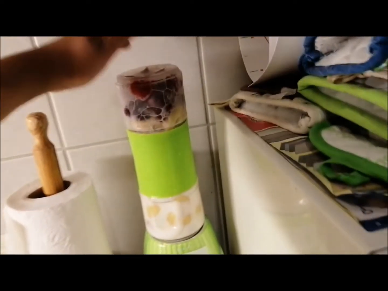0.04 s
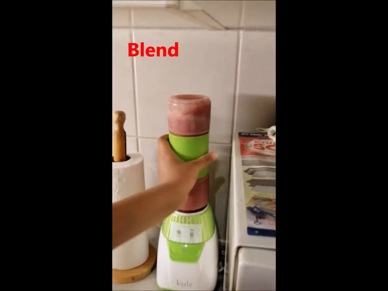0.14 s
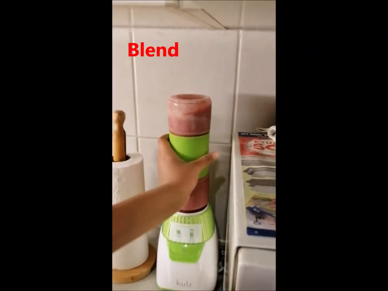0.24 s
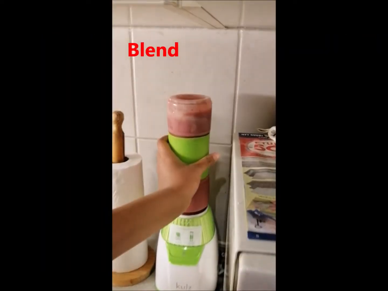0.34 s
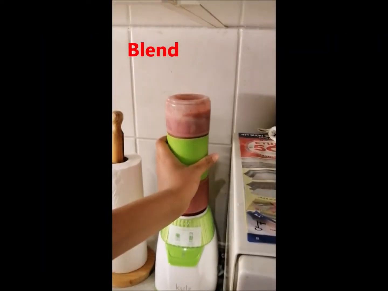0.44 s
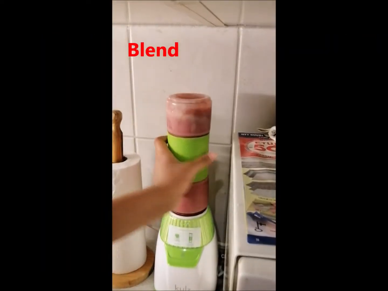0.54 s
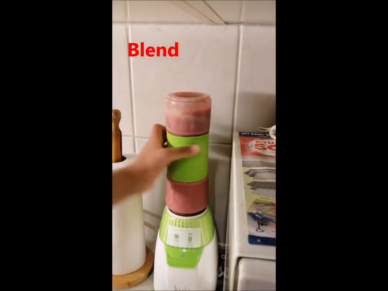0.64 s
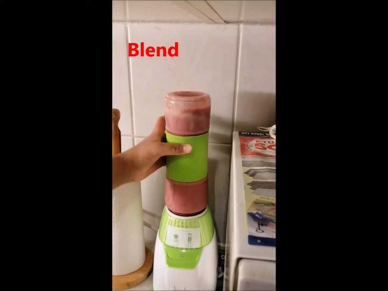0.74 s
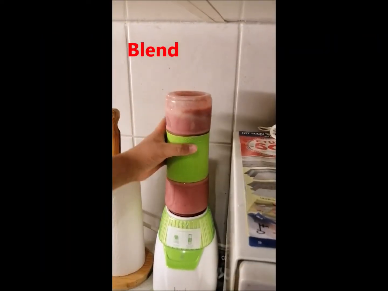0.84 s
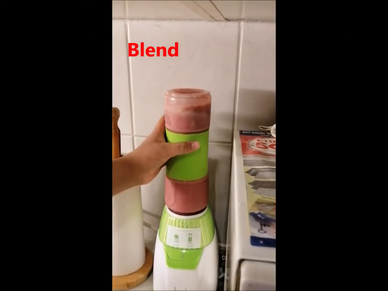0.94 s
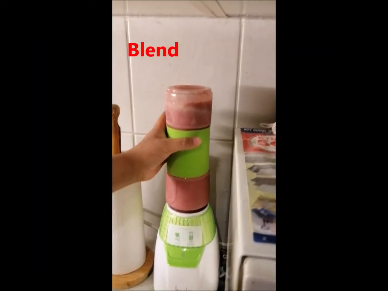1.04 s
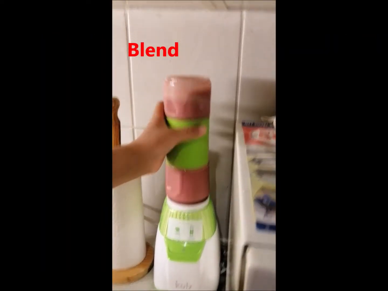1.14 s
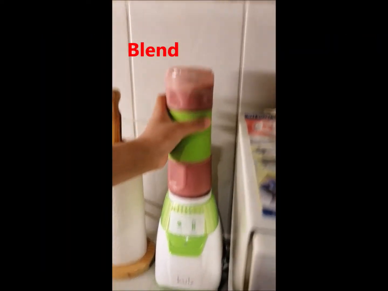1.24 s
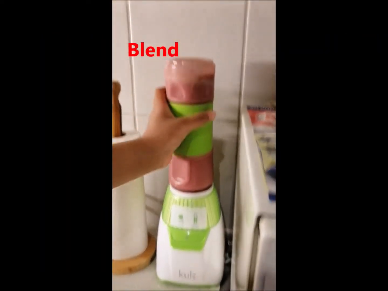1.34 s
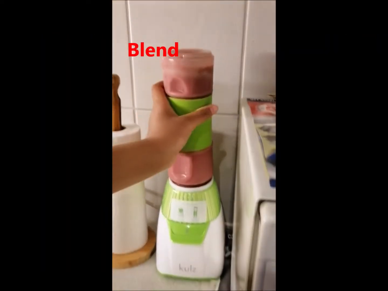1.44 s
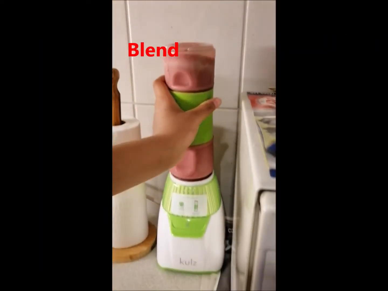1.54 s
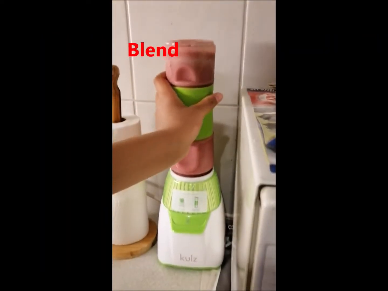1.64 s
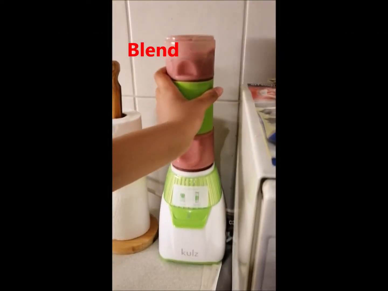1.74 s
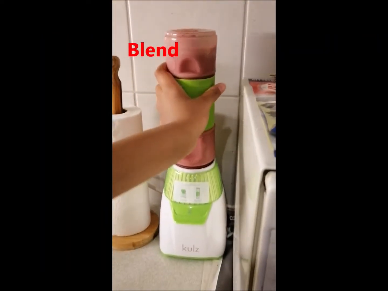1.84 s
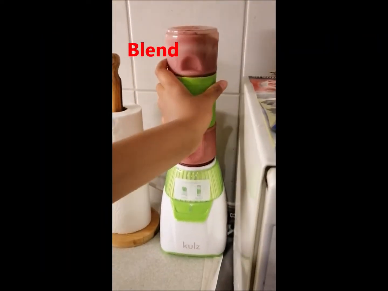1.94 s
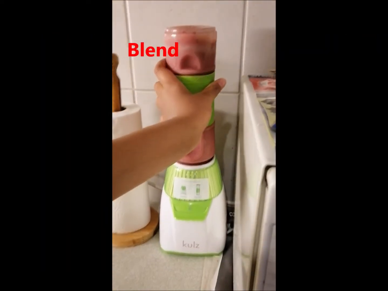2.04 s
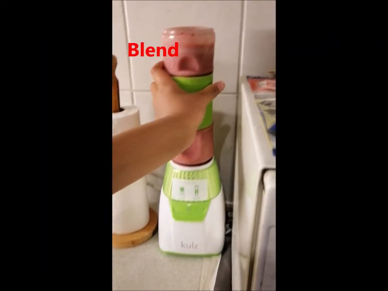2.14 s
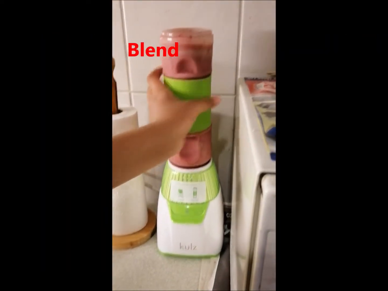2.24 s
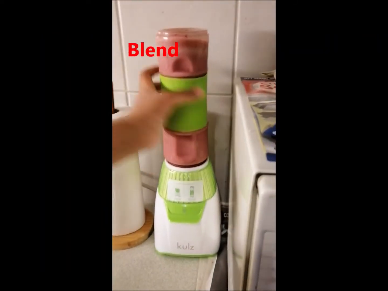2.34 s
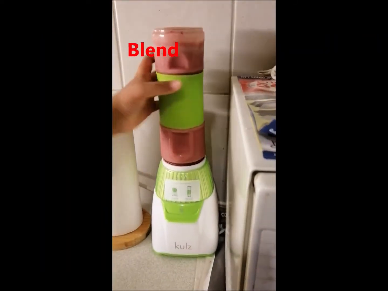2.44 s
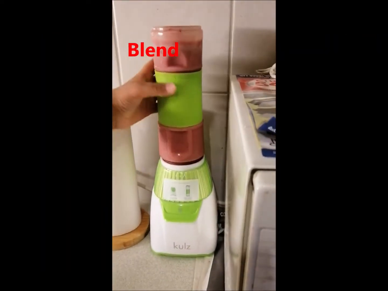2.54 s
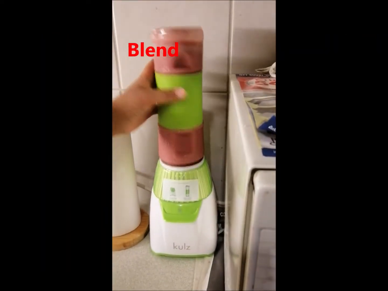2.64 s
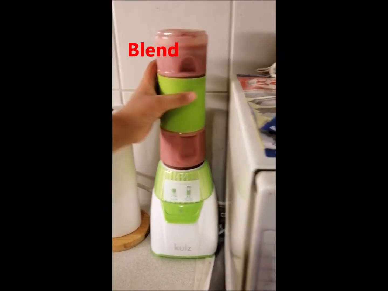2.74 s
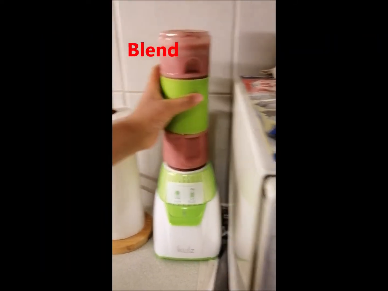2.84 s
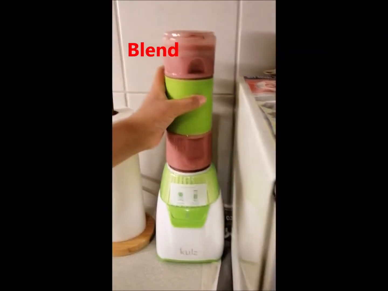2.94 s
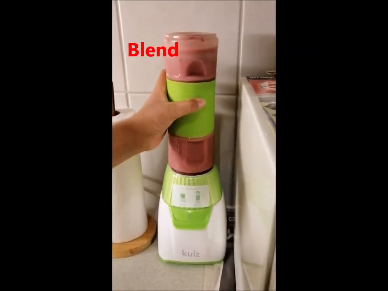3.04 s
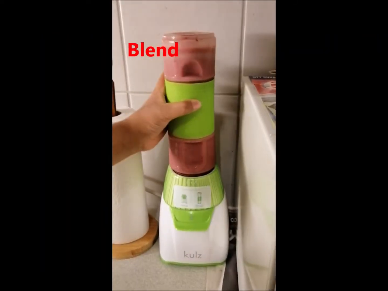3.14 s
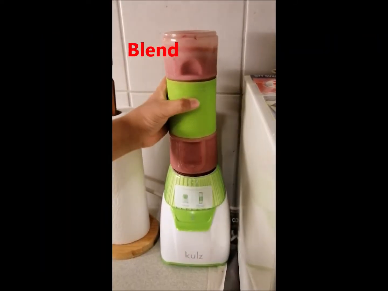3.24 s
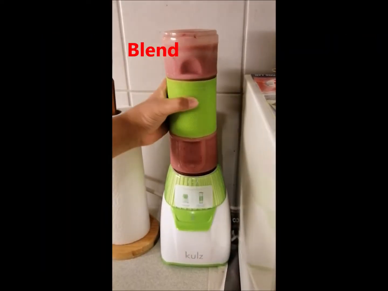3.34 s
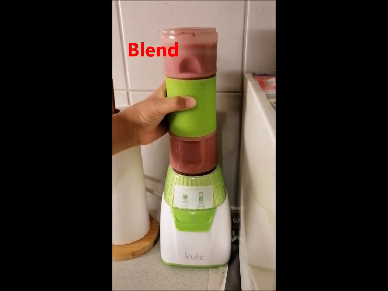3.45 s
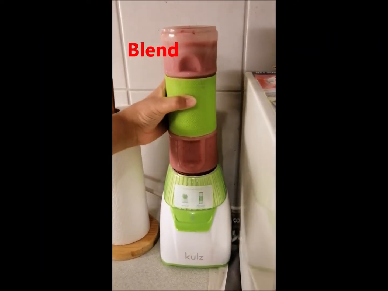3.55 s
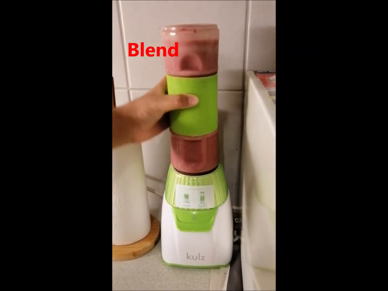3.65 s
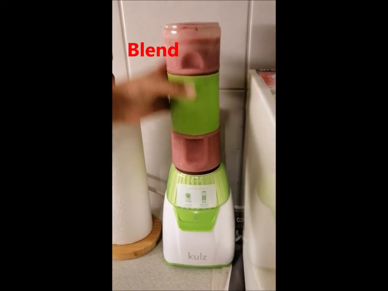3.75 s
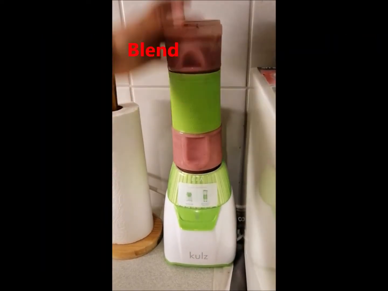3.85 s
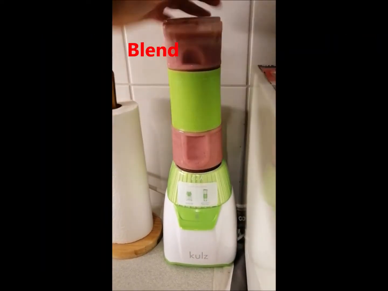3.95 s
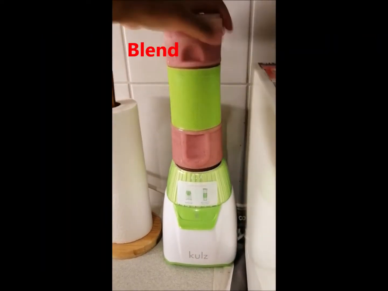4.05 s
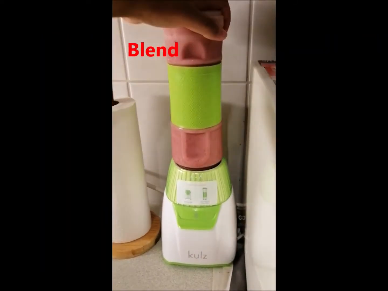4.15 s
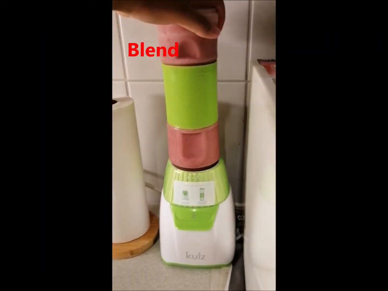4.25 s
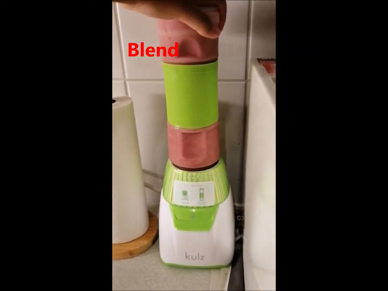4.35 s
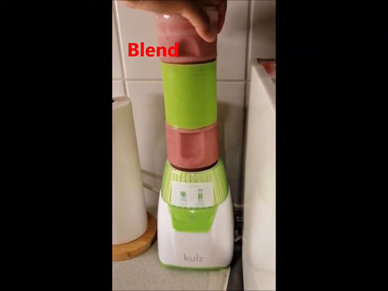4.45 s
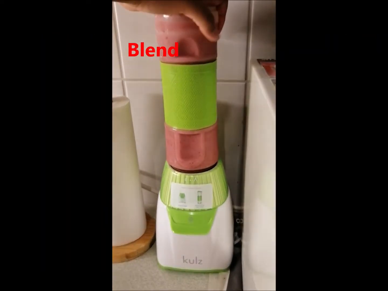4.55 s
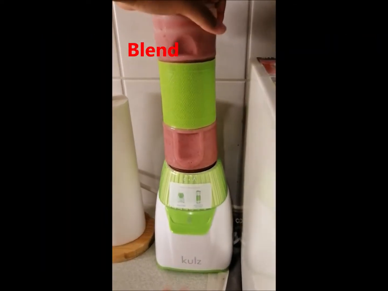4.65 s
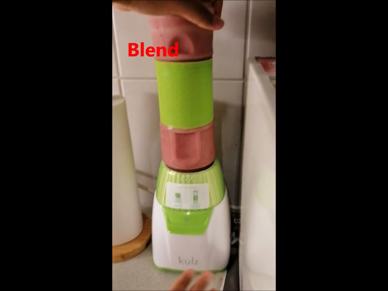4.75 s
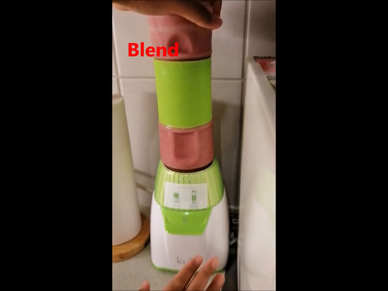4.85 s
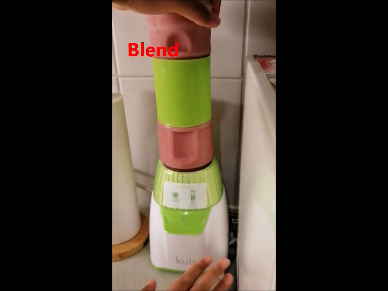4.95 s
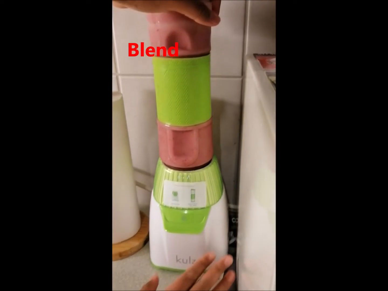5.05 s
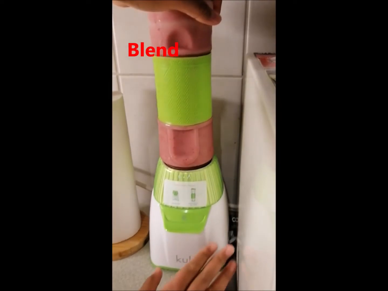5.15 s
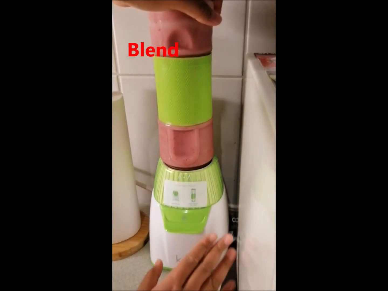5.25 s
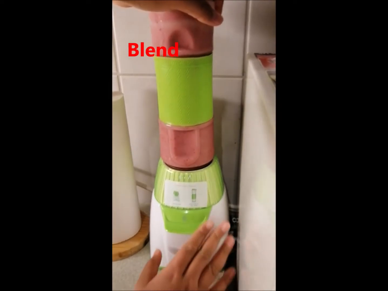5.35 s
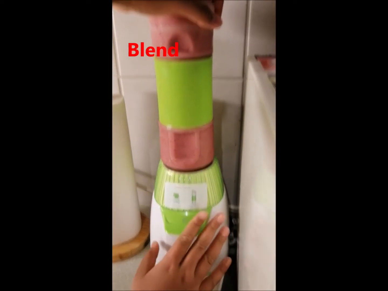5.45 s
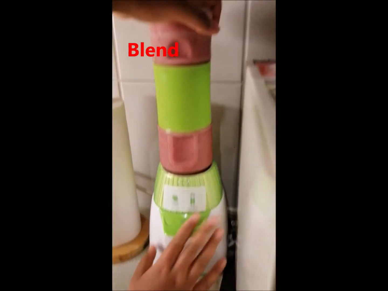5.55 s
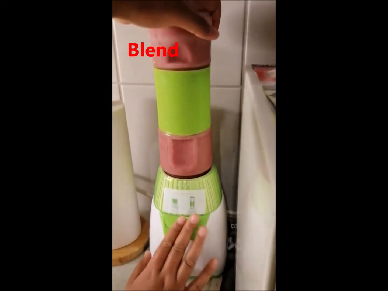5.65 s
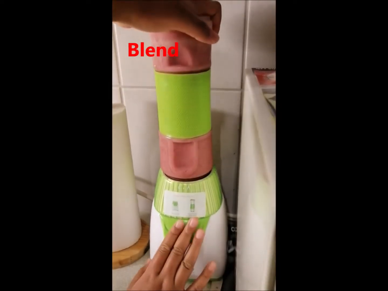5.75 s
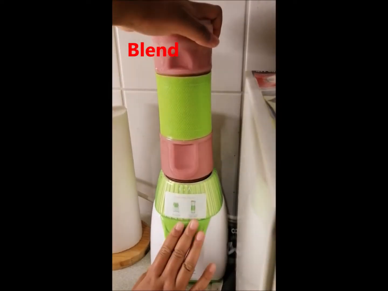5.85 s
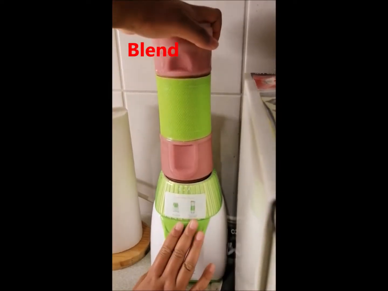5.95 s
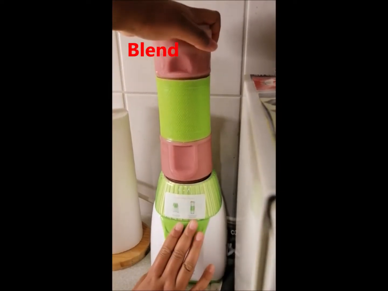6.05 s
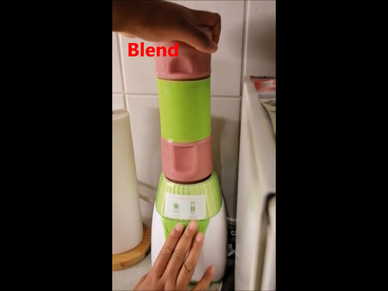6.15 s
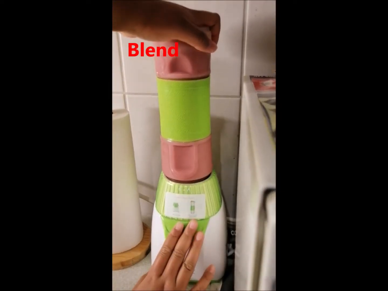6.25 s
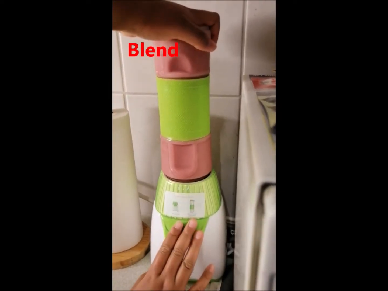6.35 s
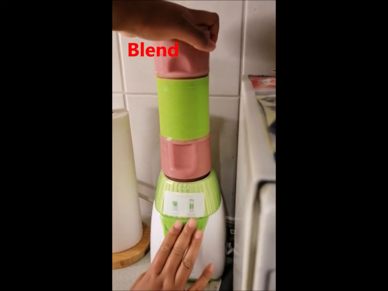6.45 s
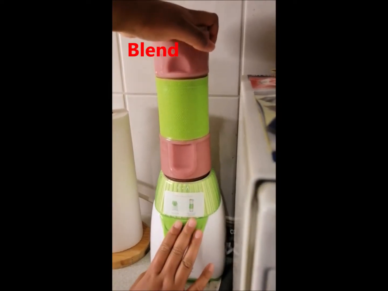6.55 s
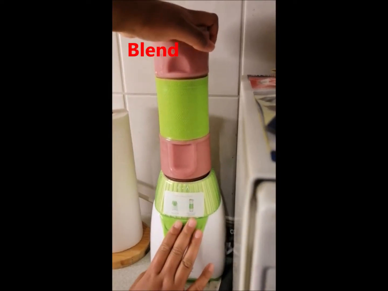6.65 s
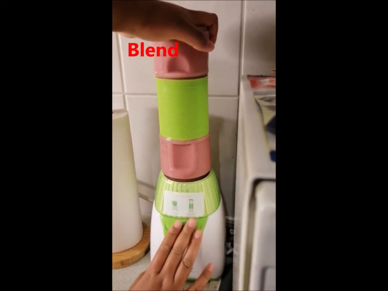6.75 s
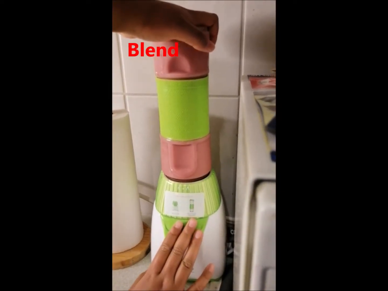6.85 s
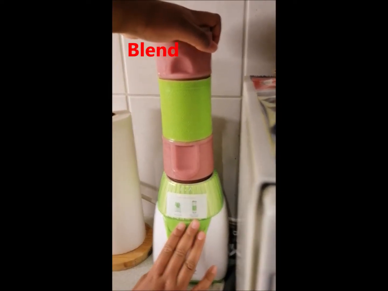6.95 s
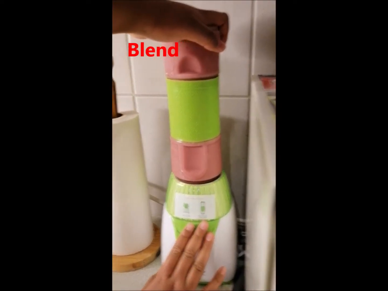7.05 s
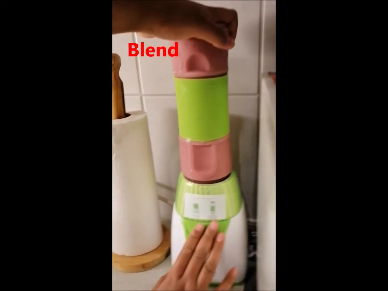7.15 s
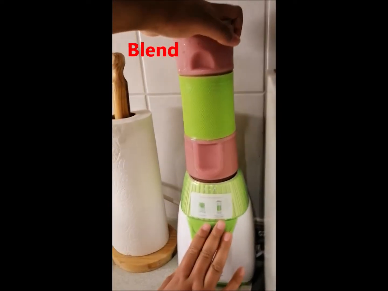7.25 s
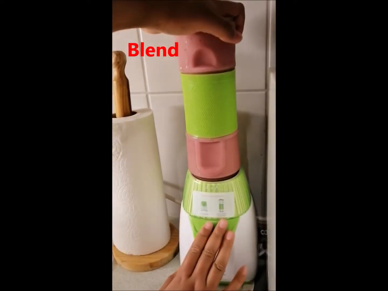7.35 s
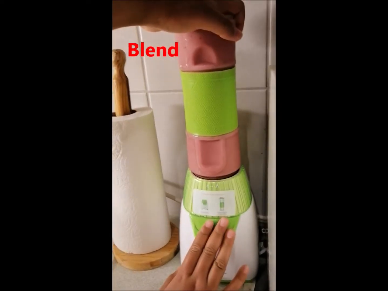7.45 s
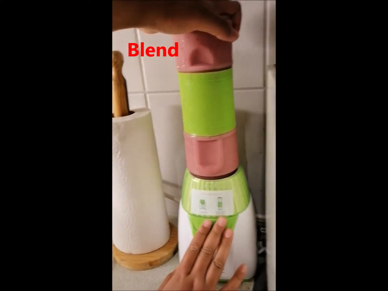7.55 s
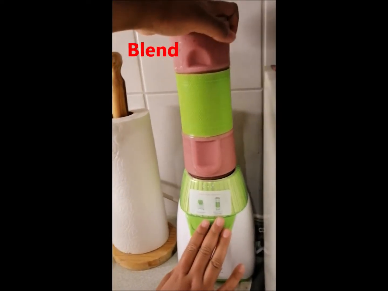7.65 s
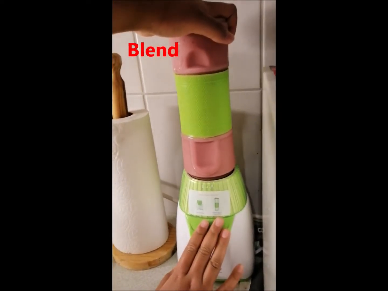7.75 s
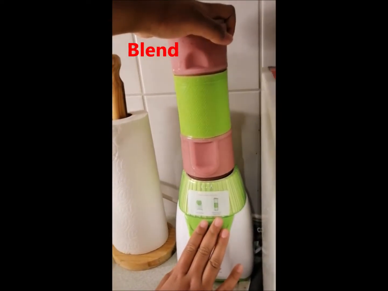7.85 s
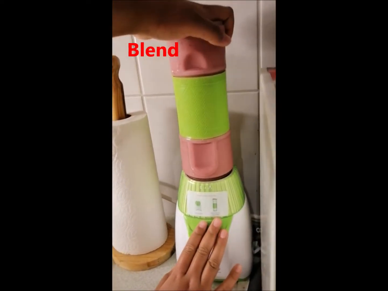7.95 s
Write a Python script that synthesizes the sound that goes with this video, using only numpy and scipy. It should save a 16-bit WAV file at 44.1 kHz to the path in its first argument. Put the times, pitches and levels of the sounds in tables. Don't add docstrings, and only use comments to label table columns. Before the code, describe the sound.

Sparse close handling clicks on a plastic bottle, soft rubbing, then abruptly a small blender motor rattles on and churns lumpy pulp noisily.

```python
import sys
import numpy as np
from scipy import signal
from scipy.fft import rfft, irfft
from scipy.io import wavfile
from scipy.ndimage import uniform_filter1d

SR = 44100
rng = np.random.default_rng(int(sys.argv[2]) if len(sys.argv) > 2 else 0)


def decibels_to_gain(level_db):
    exponent = np.asarray(level_db, float) / 20
    return 10 ** exponent


def int16_out(signal):
    q = np.round(np.clip(np.atleast_2d(signal).T, -1, 1) * 32767)
    wavfile.write(sys.argv[1], SR, q.astype(np.int16))


N = 353241
TIME_S = np.arange(N) / SR
SWITCH_ON_S = 5.925

# frequency_hz, density_db (per Hz)
SPRAY = [(1940, -15.5), (3300, -7), (3920, -10), (4700, -5.5), (5130, -1), (5500, -4.5), (6470, -5.5),
         (6800, -1), (7250, 0), (7600, -2.5), (8710, -7.5), (11100, -22.5), (12000, -20.5), (14700, -26),
         (15500, -22), (16000, -46.5)]


def colour(x, shape, keep=False):
    taps = 4096
    hz, db = np.transpose(shape)
    gain = decibels_to_gain(np.interp(np.log(np.fft.rfftfreq(taps, 1 / SR) + 1), np.log(hz), db))
    ceps = irfft(np.log(gain))
    ceps[1:taps // 2] *= 2
    ceps[taps // 2 + 1:] = 0
    response = irfft(np.exp(rfft(ceps)))
    if not keep:
        response = response / np.sqrt(np.sum(response ** 2))
    return signal.oaconvolve(x, response[None], axes=1)[:, :N]


def closed(shape):
    return [(shape[0][0] / 2, -70)] + list(shape) + [(min(shape[-1][0] * 2, SR / 2), -70)]


def pair(alike=0.32):
    shared, left, right = rng.standard_normal((3, N))
    alike = np.clip(alike, 0, 1)
    return np.sqrt(alike) * shared + np.sqrt(1 - alike) * np.array([left, right])


def lean(db):
    return decibels_to_gain(np.array([[0.5], [-0.5]]) * db)


def walk(rate):
    k = int(SR / rate)
    held = np.repeat(rng.standard_normal(N // k + 1), k)
    return 1.386 * uniform_filter1d(uniform_filter1d(held, k), k)[:N]


def swell(s, half_s):
    out = np.zeros(N)
    span = np.arange(max(int((s - 4 * half_s) * SR), 0), min(int((s + 4 * half_s) * SR), N))
    out[span] = np.exp(-((span / SR - s) / half_s) ** 2)
    return out


def bursts(s, db, t60, pan_db, rise_s, crack):
    power = np.zeros((2, N))
    for start, level_db, ring, lean_db in np.broadcast(s, db, t60, pan_db):
        i = int(max(start, 0) * SR)
        t = np.arange(min(int(ring * SR), N - i)) / SR
        decay = crack * np.exp(-t / 0.0026) + 1000 ** (-t / ring)
        shape = (1 - np.exp(-t / rise_s)) * decay
        power[:, i:i + len(t)] += (decibels_to_gain(level_db) * lean(lean_db) * shape) ** 2
    return np.sqrt(power)


def rings(x, modes, stretch, bead_db=1.5):
    on = int(SWITCH_ON_S * SR)
    out = np.zeros((2, N))
    for hz, width, db, lean_db in modes:
        tone = np.exp(2j * np.pi * hz * np.cumsum(stretch[on:]) / SR)
        fed = (x * decibels_to_gain(bead_db * walk(30)))[:, on:]
        band = signal.sosfilt(signal.butter(2, width / 2, fs=SR, output="sos"), fed / tone)
        out[:, on:] += (band * tone).real * np.sqrt(2 * SR / width) * decibels_to_gain(db) * lean(lean_db)
    return out


def tiles(x, alike_hz=420, even=0.99):
    t60_s, fade_t60_s = 0.13, 0.55
    t = np.arange(int(t60_s * SR)) / SR
    echo = rng.standard_normal((2, len(t))) * 1000 ** (-t / t60_s) * (t > .001)
    echo = echo / np.sqrt(np.sum(echo ** 2, axis=1, keepdims=True))
    echo[:, 0] = 1
    lines = rfft(echo, 2 * len(t))
    echo = irfft(lines / np.abs(lines) ** even)[:, :len(t)] * 1000 ** (-t / fade_t60_s)
    echo = echo / np.sqrt(np.sum(echo ** 2, axis=1, keepdims=True))
    low = signal.sosfilt(signal.butter(4, alike_hz, fs=SR, output="sos"), x)
    high = signal.sosfilt(signal.butter(4, alike_hz, "high", fs=SR, output="sos"), x)
    return low + signal.oaconvolve(high, echo, axes=1)[:, :N]


def kitchen():
    # frequency_hz, density_db (per Hz)
    far_shape = [(47, -42.5), (80, -3), (200, -10.5), (282, -12), (335, -14), (508, -20), (577, -20),
                 (665, -23), (886, -18), (1340, -25), (1900, -23.5), (3600, -28.5), (4680, -78),
                 (7920, -120)]
    # frequency_hz, density_db (per Hz)
    shake_shape = [(12, -13.5), (25, 2.5), (50, -6), (90, -6), (130, -6.5), (200, -18)]
    # middle_s, half_length_s, level_db
    wobbles = [
        (0.005, 0.05, -51),
        (0.504, 0.021, -59),
        (0.697, 0.094, -67),
        (1.498, 0.2, -72),
        (2.954, 0.099, -53),
        (4.31, .15, -70),
        (4.93, 0.045, -62),
    ]
    tremble_db, duck_db = -70, -19
    air = colour(pair(0.81), closed(far_shape)) * decibels_to_gain(-66.5 + 0.29 * walk(5.98))
    bright = colour(pair(0.21), closed(SPRAY)) * decibels_to_gain(-80.0 + 1.2 * walk(3.82))
    hand = decibels_to_gain(tremble_db + duck_db * (TIME_S > SWITCH_ON_S))
    hand = hand + sum(decibels_to_gain(db) * swell(s, half_s) for s, half_s, db in wobbles)
    hand = hand * decibels_to_gain(2.5 * walk(12) - 3)
    return tiles(air + bright) + colour(pair(0.25) * hand, closed(shake_shape))


def bird():
    # start_s, length_s, first_hz, last_hz, level_db
    whistles = [(.49, 0.034, 2035, 2040, -73), (0.551, .24, 2034, 2040, -73.5), (.57, .09, 5120, 5300, -83),
                (3.88, 0.076, 1960, 2200, -60), (3.901, .035, 5200, 5200, -78),
                (3.928, .03, 2060, 2060, -72), (3.92, 0.165, 2190, 2145, -68),
                (3.955, .085, 4370, 4330, -86), (4.075, 0.075, 2160, 2180, -74),
                (4.06, .07, 4300, 4340, -86), (5.0, .12, 2000, 1905, -75.5),
                (5.095, 0.08, 1905, 1885, -67.5), (5.16, 0.062, 1880, 1690, -73),
                (5.175, .03, 1940, 1940, -80), (5.22, .045, 1920, 1930, -79)]
    roundness, octave_db = 0.54, -30
    lag = np.array([[-.8], [0]])
    out = np.zeros((2, N))
    waver = 1 + 0.0052 * walk(60)
    flutter = decibels_to_gain(2.3 * walk(71))
    for s, length, first_hz, last_hz, db in whistles:
        count = int(length * SR)
        span = int(s * SR) + np.arange(count)
        along = np.linspace(0, 1, count)
        hz = (first_hz + (last_hz - first_hz) * along) * waver[span]
        angle = 2 * np.pi * np.cumsum(hz) / SR
        strength = np.sqrt(2) * decibels_to_gain(db) * np.abs(np.sin(np.pi * along)) ** roundness * flutter[span]
        out[:, span] += strength * (np.sin(angle + lag) + decibels_to_gain(octave_db) * np.sin(2 * angle))
    return out * lean(-3)


def rubbing():
    # middle_s, half_length_s, level_db
    strokes = [
        (1.25, .04, -74),
        (1.326, 0.05, -66),
        (2.382, 0.027, -64),
        (4.175, 0.21, -68),
        (4.78, 0.24, -65.5),
        (5.2, 0.39, -69),
    ]
    strength = sum(decibels_to_gain(db) * swell(s, half_s) for s, half_s, db in strokes)
    hiss = colour(pair() * strength * decibels_to_gain(1.3 * walk(40) - 2.5), closed(SPRAY))
    return signal.lfilter([1, -0.89], [1], hiss)


def jolts():
    # start_s, pitch_hz, peak_db, t60_s
    struck_modes = [(5.9295, 335, -26.5, 0.12), (5.9295, 590, -26.5, .08), (5.9245, 5200, -22.5, 0.023),
                    (5.94, 800, -28.5, 0.12), (5.962, 366, -31, 0.086), (5.976, 425, -29, 0.097),
                    (6.02, 350, -29, .1), (6.2, 320, -29.5, 0.076), (5.9295, 1503, -17.5, 0.034),
                    (5.998, 478, -25.5, 0.058), (1.105, 1600, -41, 0.071), (2.836, 1700, -44, 0.056),
                    (2.84, 820, -41, 0.13), (5.634, 335, -61, 0.26), (0.0014, 110, -39, 0.09),
                    (1.11, 162, -45, 0.25),
                    (0.102, 3300, -47, .03), (.111, 2980, -53, .04), (.112, 5850, -48, .04),
                   (.119, 3300, -57, .02), (1.106, 2260, -45, .06), (1.106, 598, -43, .1),
                   (1.308, 1550, -56, .03), (1.308, 2200, -60, .03), (1.343, 2190, -57, .03),
                   (1.646, 1148, -53, .08), (1.655, 4750, -55, 0.013), (1.632, 12500, -56, 0.0082),
                   (.017, 8700, -37, .008), (2.085, 1000, -51, .03), (4.232, 4680, -65, .03),
                   (1.728, 4820, -53, .012), (2.07, 1060, -51, 0.082), (2.381, 2510, -61, 0.03),
                   (2.374, 3300, -65, .03), (2.82, 1500, -58, .08), (2.86, 3500, -56, .1),
                   (3.216, 2150, -56, 0.059), (3.216, 4850, -57, 0.029), (3.277, 599, -54, .04),
                   (3.285, 4900, -59, .02), (3.293, 600, -55, .03), (3.491, 1500, -62, .03),
                   (3.5, 189, -51, .25), (4.17, 4250, -59, .03), (4.207, 5210, -55, .03),
                   (4.361, 2590, -51, .03), (4.361, 3404, -53, .03), (4.524, 2400, -63, .03),
                   (5.16, 5150, -66, .05), (5.447, 1100, -56, 0.052), (5.634, 2700, -59, .03)]
    out = np.zeros(N)
    rattle = 0.9 * walk(350)
    for s, hz, db, t60 in struck_modes:
        i = int(s * SR)
        t = np.arange(int(t60 * SR)) / SR
        blur = (rattle[i:][:len(t)] - rattle[i]) * min(hz / 1500, 1)
        envelope = decibels_to_gain(db) * (1 - np.exp(-t / 0.00044)) * 1000 ** (-t / t60)
        out[i:][:len(t)] += envelope * np.sin(2 * np.pi * hz * t + blur)
    return np.array([out, out])


def snaps():
    # start_s, level_db, left_minus_right_db
    snap_events = [(0.0166, -30.5, 5.5), (.121, -49.5, 0), (1.106, -42, 4), (1.2838, -44, 0),
                   (1.357, -64, 2), (1.6058, -54, 0), (1.632, -49, -2), (2.0235, -52, 2), (2.128, -62, -2),
                   (2.5114, -52, 4), (2.8092, -59, 0), (3.3006, -63, 2), (3.4069, -64, 0), (3.8943, -62, 1),
                   (4.2709, -62, -2), (5.1694, -59, 1), (1.655, -50, -2), (1.728, -51, 0), (2.033, -54, 0),
                   (2.843, -36, 0), (3.285, -61, 0), (4.3618, -52, 0), (4.5675, -44, -6), (5.954, -22, 0),
                   (5.971, -22, 0), (5.994, -26, 0), (6.018, -25, 0), (6.1, -29, 0), (6.207, -27, 0),
                   (6.252, -29, 0), (6.486, -29, 0), (6.778, -30, 0), (6.878, -29, 0), (7.0575, -28, 0),
                   (7.275, -28, 0), (7.626, -26, 0), (7.74, -29, 0), (7.812, -26, 0), (7.933, -28, 0)]
    # frequency_hz, density_db (per Hz)
    snap_shape = [(2000, -13.5), (3300, -8), (6500, -3), (8700, 0), (11500, -10.5), (15000, -11.5),
                  (16000, -35)]
    s, db, pan_db = np.transpose(snap_events)
    strength = bursts(s, db, t60=0.005, pan_db=pan_db, rise_s=0.00026, crack=0.1)
    return colour(pair(0.3) * strength, closed(snap_shape))


def handling():
    # start_s, tick_db, clack_over_tick_db, thud_over_tick_db, thud_hz
    knocks = [(0.0024, -57.5, -7, 1, 107), (0.0496, -61, -12, 0, 165), (0.775, -63.5, -6, 1, 353.7),
              (1.1033, -51, 3, -4, 330), (1.1058, -36.5, -3, -2, 250), (1.284, -37.5, -21, -10, 592),
              (1.309, -54.5, -1.5, 6.5, 190.4), (1.348, -58, 0, 10.5, 182), (1.605, -62, -8, 7.5, 85.6),
              (1.643, -62, 12.5, 11.5, 600), (2.068, -57.5, 9.5, 5.5, 335), (2.128, -59, -3, 7.5, 633),
              (2.511, -55, 3, 3.5, 338.5), (2.6199, -71.5, -4.5, 16, 159.2), (2.809, -61, -5, 11, 100.7),
              (2.828, -56, 0, -5, 600), (2.8325, -52, 6, 0, 600), (2.8374, -39, -4, -0.5, 600),
              (2.842, -31, -9.5, 3, 296), (3.2145, -58.5, 7, 14, 596), (3.232, -70.5, 0, 20, 190),
              (3.277, -67, 5.5, 22, 158.2), (3.286, -61, -12, 10, 88.3), (3.4905, -61, 8, 13, 184.2),
              (4.2718, -69, -4, 12.5, 183), (4.333, -66, 9.5, 12.5, 240), (5.6324, -57.5, -1.5, -16, 338.7)]
    # start_s, tick_db, clack_over_tick_db, left_minus_right_db
    finger_ticks = [(0.0168, -43.5, -26, 2), (0.0294, -53.5, -12, -19), (0.095, -62, -3, -8),
                    (0.102, -51, -6, -8), (0.111, -51.5, -9, -18), (0.117, -49.5, -10, -12),
                    (1.6318, -57, -12, -2), (1.7276, -57, -7, -12), (2.023, -51, -5, -10),
                    (2.0322, -43, -12, -10), (2.3722, -61, -7, -16), (2.3844, -54.5, -15, -8),
                    (3.04, -70, -15, -13), (3.19, -66, -6, -12), (3.306, -62, -7, -7),
                    (3.524, -69, -13, -8), (2.4452, -64, -13, -4), (3.8984, -68, 0, -6),
                    (4.21, -65, -1.5, -13), (4.3615, -44, -11, -11), (4.523, -63, 3, -9),
                    (4.448, -66, -20, -10), (4.496, -73, 4, -10), (4.5675, -67, -15, -19),
                    (4.66, -63, -10, -10), (5.166, -59, -47, -7), (5.4467, -59, 1.5, -11)]
    # frequency_hz, density_db (per Hz)
    clack_shape = [(400, -11), (650, -1), (1100, -4), (1500, -1.5), (1800, -5.5), (2200, -5), (2800, -11),
                   (3300, -15), (4200, -47)]
    # frequency_hz, density_db (per Hz)
    thud_shape = [(35, -27), (90, 2.5), (160, -0.5), (280, 0), (420, -16), (600, -6), (900, -24.5)]
    fingers = [(s, db, over_db, over_db - 4, 335, lean_db) for s, db, over_db, lean_db in finger_ticks]
    touches = sorted(fingers + [(*row, -10) for row in knocks])
    s, tick_db, clack_db, thud_db, thud_hz, pan_db = np.transpose(touches)
    pan_db = pan_db + 11.0
    crackle = decibels_to_gain(2.2 * walk(500) - 0.3)
    tick_strength = bursts(s, tick_db - 2.0, 0.029, pan_db, 0.0014, 1.63)
    tick = colour(pair() * crackle * tick_strength, closed(SPRAY))
    clack_strength = bursts(s, tick_db + clack_db - 0.5, 0.09, pan_db, 0.0015, 1.1)
    clack = colour(pair() * crackle * clack_strength, closed(clack_shape))
    push = bursts(s, tick_db + thud_db - 3.5, 2.55 / np.sqrt(thud_hz), .3 * pan_db, 0.0012, .1)
    latest = np.clip(np.searchsorted(s, TIME_S) - 1, 0, None)
    note = np.sin(2 * np.pi * np.cumsum(thud_hz[latest] * (1 + 0.17 * walk(90))) / SR)
    thud = colour(pair(0.82) * push, closed(thud_shape)) * decibels_to_gain(-2.0)
    return tick + clack + push * note + thud


def load():
    # time_s, load (0-1)
    bite_curve = [
        (6.05, 0.99),
        (6.575, 0.94),
        (6.6, 0.04),
        (7.36, 0.08),
        (7.46, 0.34),
        (8.01, 0.42),
    ]
    # middle_s, churn_up_db, whine_up_db
    surges = [(6.0, 0, -4), (6.54, 0, -1), (6.63, 1.5, 1), (6.69, 1, 1), (6.76, 1, 2.5), (6.83, 1.5, 2),
              (6.94, 0.5, 2), (7.05, 0, 0), (7.233, 6, 7), (7.3, 1.5, 4.5), (7.385, 4, 7.5),
              (7.448, 6, 15.5), (7.54, 3.5, 8.5), (7.59, 3.5, 6.5), (7.72, 3.5, 10), (7.81, 4, 15.5),
              (7.88, 4, 5), (7.97, 0.8, 8), (8.0, 3, -2)]
    bite = np.interp(TIME_S, *np.transpose(bite_curve))
    churn_db, whine_db = sum(np.outer(up_db, swell(s, 0.036)) for s, *up_db in surges)
    spray_db = -40.5 + 3.55 * bite + 0.56 * churn_db
    slosh_db = -41.5 + 4.34 * bite + 0.68 * churn_db
    wall_db = -40 + 3.7 * bite + 0.91 * churn_db
    ring_db = -42.5 - 11 * bite + whine_db
    rumble_db = -60.5 + 15.4 * bite + 0.23 * churn_db
    return spray_db, slosh_db, wall_db, ring_db, rumble_db


def motor():
    # time_s, shaft_hz, hum_db
    shaft = [
        (5.93, 187.3, -50),
        (6.0, 193.6, -49.5),
        (6.6, 190.4, -53),
        (6.76, 211.6, -55),
        (7, 212.5, -58),
        (7.24, 211.9, -54.5),
        (7.48, 204.1, -50.5),
        (7.6, 201.4, -45.5),
        (8.01, 202.6, -45.5),
    ]
    s, shaft_hz, hum_db = np.transpose(shaft)
    hz = np.interp(TIME_S, s, shaft_hz) * (1 + 0.008 * walk(30))
    angle = 2 * np.pi * np.cumsum(hz) / SR
    second = decibels_to_gain(-17 + 1.9 * walk(9)) * np.sin(2 * angle)
    third = decibels_to_gain(-5.0 + walk(5.6)) * np.sin(3 * angle)
    level = decibels_to_gain(np.interp(TIME_S, s, hum_db, left=-150) + 2.4 * walk(21))
    return angle, np.sqrt(2) * level * (np.sin(angle) + second + third)


def blade_drive(angle):
    hits = (rng.random(N) < 130 / SR) * decibels_to_gain(2.75 * np.minimum(rng.exponential(size=N), 3))
    bits = signal.lfilter([1], [1, -np.exp(-1 / (0.0034 * SR))], hits)
    drive = (1 + 0.8 * bits) * (1 + 0.32 * np.cos(2 * angle))
    onset = np.clip((TIME_S - SWITCH_ON_S) / 0.0044, 0, 1)
    return drive / np.sqrt(np.mean(drive ** 2)) * onset


def lump_blows():
    # start_s, crack_db, ring_over_crack_db, t60_s
    slack = [
        (5.924, -26, 8, 0.069),
        (5.9295, -29, -6, 0.043),
        (5.9373, -16.5, -10, 0.032),
        (5.953, -23, -10, 0.03),
        (5.9688, -17.5, -19, 0.029),
        (5.9944, -17.5, 6, 0.027),
        (6.016, -21.5, -18.5, 0.028),
        (6.0245, -34, -8, 0.029),
    ]
    # start_s, crack_db, ring_over_crack_db
    lumps = [(6.0983, -26.5, 2), (6.1807, -30, -18), (6.2008, -25.5, 11.5), (6.2316, -27, -7),
             (6.248, -26, 7), (6.357, -27, 13), (6.485, -27.5, -10), (6.5143, -27, -7), (6.556, -32, 4),
             (6.6432, -27, 1), (6.72, -28.5, 8), (6.755, -29, -14), (6.807, -30, -1), (6.878, -28, -8),
             (6.942, -30.5, 9), (7.0571, -29, 9), (7.165, -34, -10), (7.2741, -28, -1), (7.358, -28.5, -2),
             (7.458, -25.5, -14), (7.495, -44, -7), (7.578, -27.5, 2), (7.625, -22.5, 8), (7.7014, -38, 1),
             (7.736, -24.5, 1), (7.749, -25.5, -13), (7.811, -21, -13), (7.867, -26, 10.5),
             (7.9327, -25.5, 11.5), (7.9819, -29, -2)]
    s, crack_db, knock_db, t60 = np.transpose(slack + [(*row, 0.035) for row in lumps])
    crack = bursts(s, crack_db - 5.5, t60, 0, 0.00077, 1.2)
    knock = bursts(s, crack_db + knock_db - 0.5, 1.17 * t60, 0, 0.014, 0.18)
    return crack, knock


def churn(drive, crack, knock, spray_db, slosh_db):
    # frequency_hz, density_db (per Hz)
    pulp_shape = [(300, -26), (450, 0), (700, -0.5), (1000, -0.5), (1350, -2.5), (1700, 2), (2500, -3.5),
                  (3100, -6.5), (3800, -19)]
    grit = pair()
    motor_top = signal.ellip(8, .3, 50, 15050, fs=SR, output="sos")
    steady = signal.sosfilt(motor_top, grit * decibels_to_gain(spray_db - 0.5) * drive)
    spray = colour(steady + grit[:, ::-1] * crack, closed(SPRAY))
    slosh = colour(pair() * np.hypot(decibels_to_gain(slosh_db + 1.5) * drive, knock), closed(pulp_shape))
    return spray + slosh


def bottle_and_collar(drive, knock, wall_db, ring_db):
    # centre_hz, width_hz, level_db, left_minus_right_db
    bottle_modes = [(574.3, 91, -4, -10.5), (820, 60, -9, 5), (915, 70, -8, 10), (1073, 95, -4.5, 0.5),
                    (1301, 30, -10, 3), (1508, 105, -6.5, -8.5), (2120, 35, -9, 1), (2315, 50, -7, 1.5),
                    (2421, 156, -4.5, 0.5), (2643, 50, -13, 1)]
    # centre_hz, width_hz, level_db, left_minus_right_db
    collar_modes = [
        (1880, 67, -2, 1.5),
        (1768, 47, -9, -1),
        (1860, 174, -5, -1),
    ]
    force = pair(0.38) * np.hypot(decibels_to_gain(wall_db - 6.5) * drive, 0.31 * knock)
    walls = rings(force, bottle_modes, 1 + 0.006 * walk(8.7))
    collar_force = pair(0.33) * decibels_to_gain(ring_db - 1.0) * drive
    return walls + rings(collar_force, collar_modes, 1 + 0.003 * walk(7.1), bead_db=-0.4)


def housing_and_counter(drive, slosh_db, rumble_db):
    # centre_hz, width_hz, level_db, left_minus_right_db
    housing_modes = [
        (261.4, 26, -14, 4.5),
        (341, 60, 1, 0.5),
        (415, 42, -2.5, 4.5),
        (512, 113, -5.5, 4),
    ]
    # centre_hz, width_hz, level_db, left_minus_right_db
    counter_modes = [
        (95.5, 13.8, -2.5, -1.5),
        (135, 16, -2, 2),
        (161, 50, -1.5, -0.5),
    ]
    # time_s, pitch_ratio
    press = [
        (6.02, 1.01),
        (6.17, 0.89),
        (6.5, 0.94),
        (6.62, 0.97),
        (7.3, 1.044),
        (7.6, 0.87),
    ]
    housing_force = pair(0.86) * drive * decibels_to_gain((slosh_db + rumble_db) / 2 - 0.5)
    shake = rings(housing_force, housing_modes, np.interp(TIME_S, *np.transpose(press)))
    counter_force = pair(0.98) * drive * decibels_to_gain(rumble_db - 2.0)
    rumble = rings(counter_force, counter_modes, 1 + 0.019 * walk(6), bead_db=3.0)
    low_cut = signal.butter(4, 52, "high", fs=SR, output="sos")
    return signal.sosfilt(low_cut, shake + rumble)


def bottle_note():
    # middle_s, half_length_s, level_db
    throws = [(6.096, 0.024, -37), (6.202, .03, -41), (6.3, .012, -40), (6.412, .025, -39),
              (6.519, 0.01, -40), (6.56, 0.0082, -40), (6.69, .018, -48), (6.789, .012, -43.5),
              (6.817, 0.0093, -40), (7.061, 0.0091, -36), (7.236, 0.014, -35.5), (7.291, 0.017, -42.5),
              (7.353, 0.022, -41), (7.42, 0.016, -40.5), (7.455, 0.012, -36), (7.55, 0.025, -36.5),
              (7.662, .012, -35.5), (7.704, 0.014, -36.5), (7.74, 0.014, -31), (7.849, 0.026, -36.5),
              (7.885, 0.011, -39), (7.94, .014, -42)]
    strength = sum(decibels_to_gain(db) * swell(s, half_s) for s, half_s, db in throws)
    angle = 2 * np.pi * 579 * np.cumsum(1 + .03 * walk(110)) / SR
    lead = np.array([[1.4], [0]])
    return np.sqrt(2) * decibels_to_gain(-1.0) * strength * np.sin(angle + lead) * lean(-4.5)


def whine_core(whine):
    angle = 2 * np.pi * 1887 * np.cumsum(1 + .022 * walk(70)) / SR
    return np.sqrt(2) * whine * decibels_to_gain(-7.5 + 1.9 * walk(35)) * np.sin(angle) * lean(-2.5)


def blender():
    angle, hum = motor()
    spray_db, slosh_db, wall_db, ring_db, rumble_db = load()
    drive = blade_drive(angle)
    crack, knock = lump_blows()
    airborne = tiles(churn(drive, crack, knock, spray_db, slosh_db))
    walls = bottle_and_collar(drive, knock, wall_db, ring_db)
    low = housing_and_counter(drive, slosh_db, rumble_db)
    turn_db = 4.8 - 3 * (TIME_S - SWITCH_ON_S)
    tones = bottle_note() + whine_core(decibels_to_gain(ring_db) * (drive > 0))
    return (airborne + walls) * lean(turn_db) + low + hum + tones


def scene():
    touches = tiles(handling() + rubbing() + jolts())
    return kitchen() + bird() + touches + snaps() + blender()


def roll_off(x):
    return signal.sosfilt(signal.butter(12, 16430, fs=SR, output="sos"), x)


def record(dry):
    # frequency_hz, left_minus_right_db
    unlike = [(60, -2), (400, -4.5), (1300, -3.5), (2500, -9.5), (3400, 2), (5000, -10), (7000, -10),
              (8600, 5.5), (10000, 3), (12000, -1)]
    gap_start_s, gap_end_s = .1222, .497
    hz, lean_db = np.transpose(unlike)
    left = colour(dry[[0]], np.c_[hz, lean_db / 2], keep=True)[0]
    right = colour(dry[[1]], np.c_[hz, -lean_db / 2], keep=True)[0]
    heard = np.array([np.pad(left, (5, 0))[:N], right])
    heard = heard + decibels_to_gain(-80.0) * rng.standard_normal(heard.shape)
    heard = signal.sosfilt(signal.ellip(10, .2, 80, 15720, fs=SR, output="sos"), heard)
    heard = heard - decibels_to_gain(-51.5) * np.exp(-np.abs(TIME_S - gap_end_s) / 0.077)
    heard = heard * ((TIME_S < gap_start_s) | (TIME_S > gap_end_s))
    return roll_off(heard)


dry = scene()
out = record(dry)
int16_out(out)
```